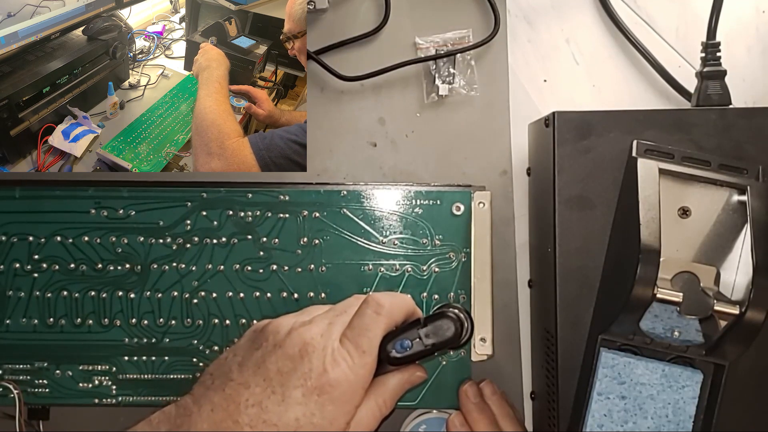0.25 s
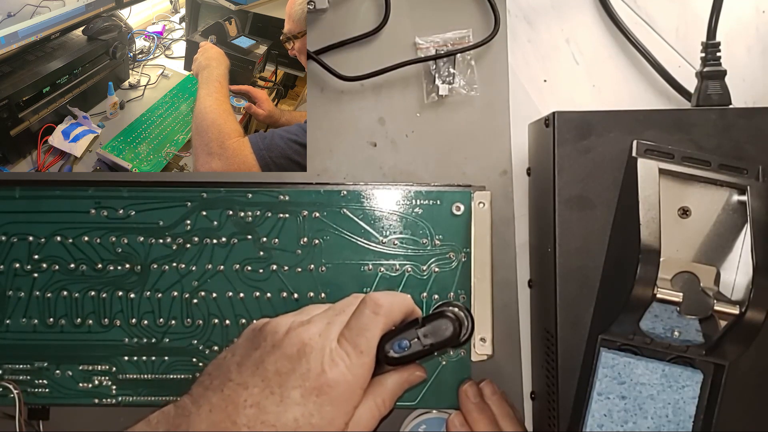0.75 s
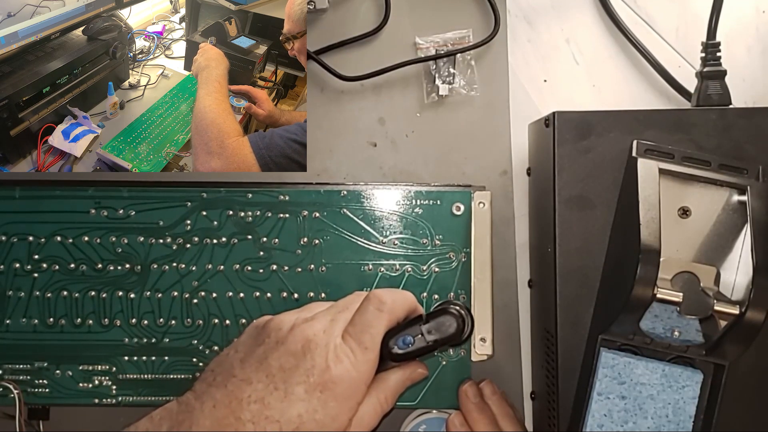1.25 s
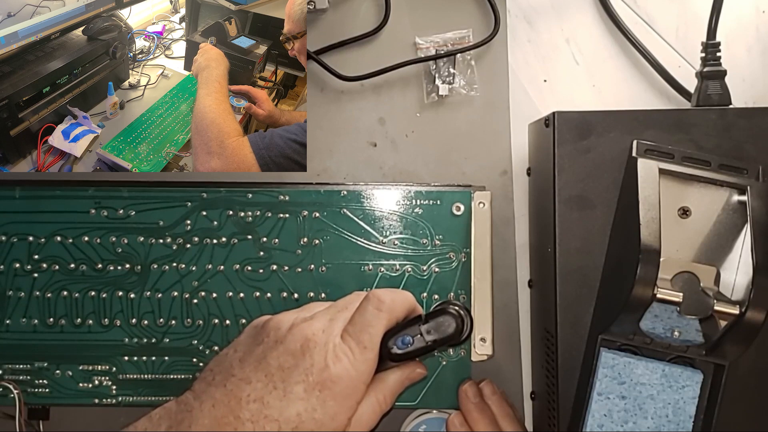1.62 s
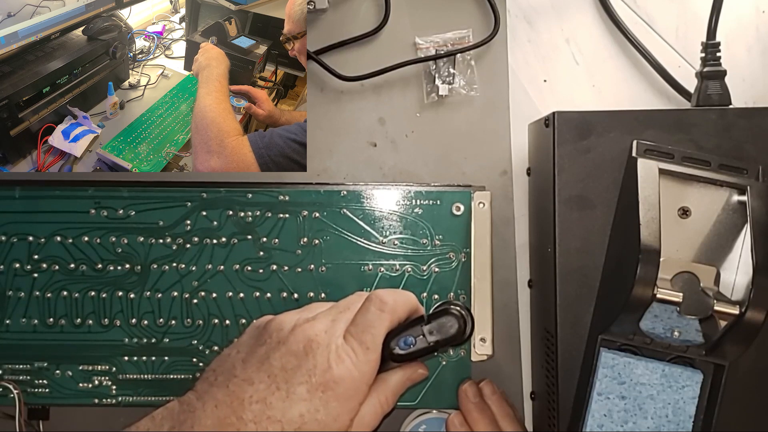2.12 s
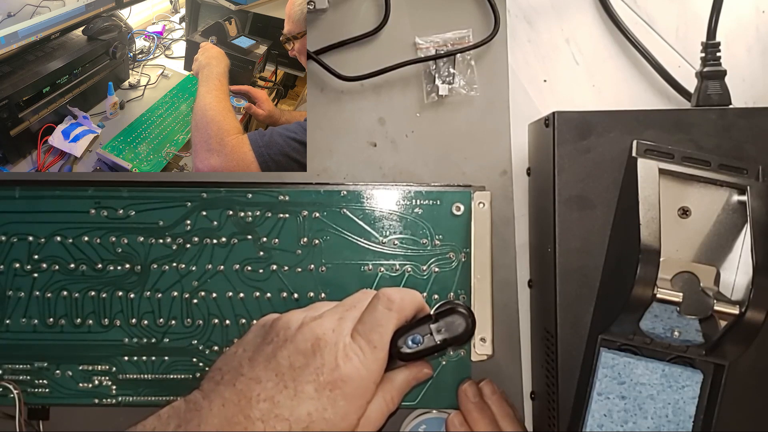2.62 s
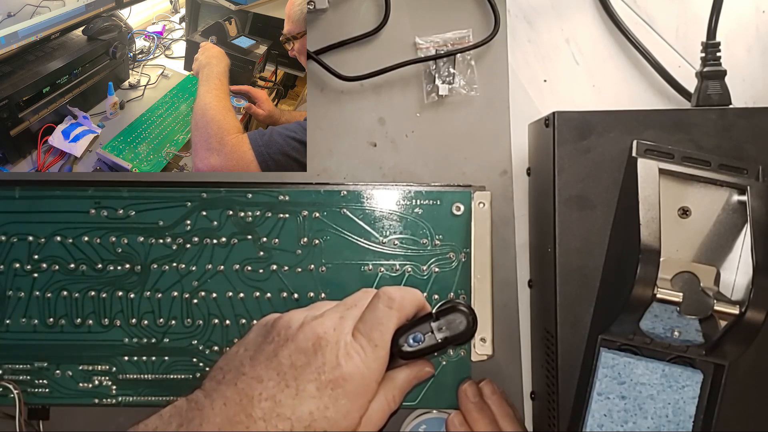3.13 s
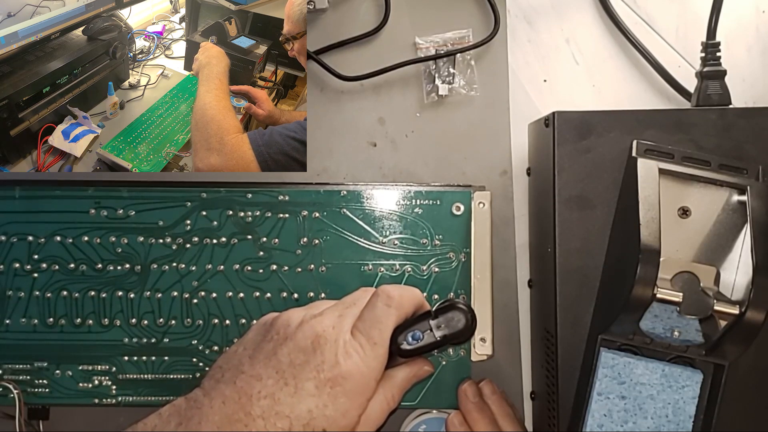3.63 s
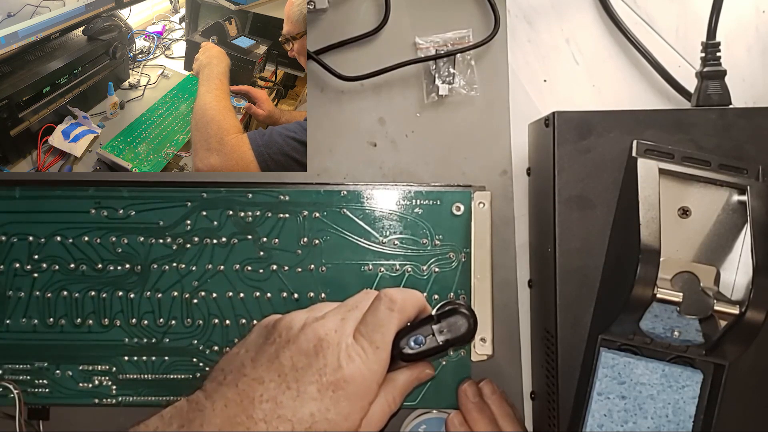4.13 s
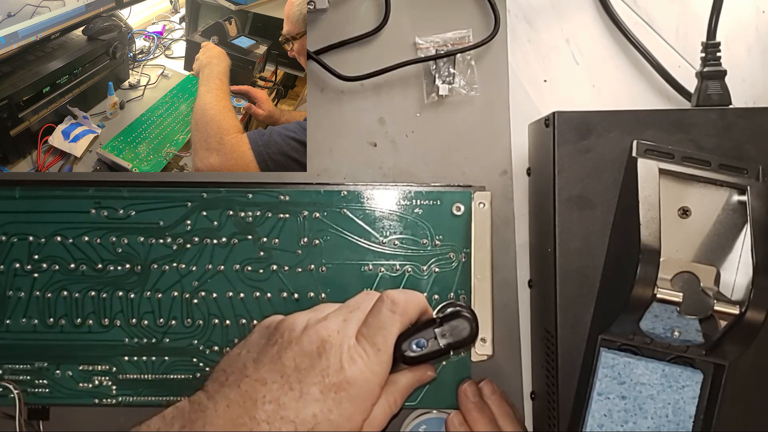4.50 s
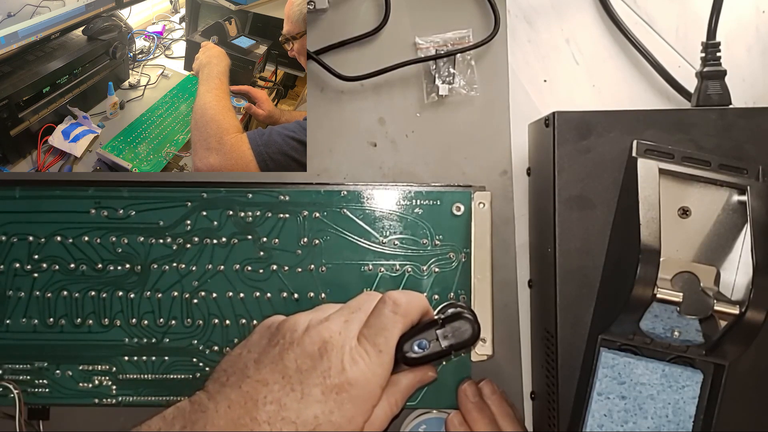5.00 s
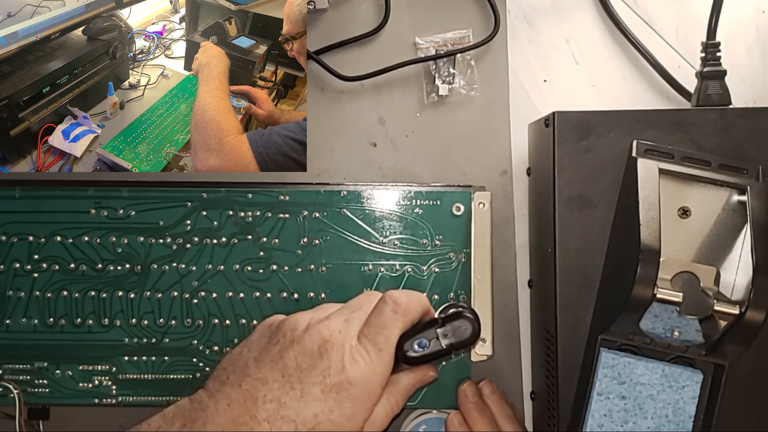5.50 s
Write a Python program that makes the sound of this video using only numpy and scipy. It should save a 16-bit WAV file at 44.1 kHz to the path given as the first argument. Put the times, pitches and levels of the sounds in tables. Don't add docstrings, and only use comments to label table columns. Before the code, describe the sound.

Quiet bench with ventilation rumble and a few soft board touches, then a trigger snap, a rough vacuum motor burr of over a second, and a release click.

```python
import sys
import numpy as np
from scipy import signal
from scipy.fft import rfft, irfft
from scipy.io import wavfile
from scipy.ndimage import uniform_filter1d

SR = 44100
rng = np.random.default_rng(int(sys.argv[2]) if len(sys.argv) > 2 else 0)


def invert_db(level):
    return 10 ** (np.asarray(level, dtype=float) / 20)


def wrap_up_sound(samples):
    columns = np.atleast_2d(samples).T
    tamed = np.clip(columns, -1, 1)
    steps = np.round(tamed * 32767).astype(np.int16)
    wavfile.write(sys.argv[1], SR, steps)


N = 253575
T = np.arange(N) / SR
HZ = np.fft.rfftfreq(N, 1 / SR) + 1e-3


def at(table, hz):
    table_hz, value = np.array(table).T
    return np.interp(np.log(hz), np.log(table_hz), value)


def humps(modes, hz):
    return sum(invert_db(2 * db) / (1 + (2 * (hz - f) / width) ** 2) for f, width, db in modes)


def walk(rate_hz, size=N):
    hold = int(SR / rate_hz)
    draws = rng.standard_normal(N // hold + 1)[:size // hold + 1]
    steps = np.repeat(draws, hold)
    return 1.3 * uniform_filter1d(uniform_filter1d(steps, hold), hold)[:size]


# (time [s], speed [Hz])
SHAFT_SPEED = [
    (4.18, 27),
    (4.23, 30.3),
    (4.3, 29.9),
    (4.37, 28.3),
    (4.43, 27.41),
    (5.57, 27.41),
    (5.62, 22),
]
# (rate [Hz], swing [Hz], phase [rad], overtone [Hz], its phase [rad], start [s])
CIRCLING = (5.5, 1.0, -2.5, .23, 1.34, 4.45)
SEAL_S, SEAL_WIDTH_S = 4.36, 0.072


def shaft():
    rate_hz, swing_hz, swing_rad, overtone_hz, overtone_rad, since_s = CIRCLING
    circle = 2 * np.pi * rate_hz * (T - since_s)
    sealed = 1 / (1 + np.exp(-np.clip((T - SEAL_S) / SEAL_WIDTH_S, -30, 30)))
    steady_hz = np.interp(T, *np.transpose(SHAFT_SPEED))
    sway = swing_hz / rate_hz * np.sin(circle + swing_rad)
    sway = sway + overtone_hz / rate_hz / 2 * np.sin(2 * circle + overtone_rad)
    angle = 2 * np.pi * np.cumsum(steady_hz) / SR
    angle = angle - angle[int(since_s * SR)] + sealed * sway + .012 * walk(25)
    return np.gradient(angle) * SR / (2 * np.pi), angle, sealed


# (multiple of shaft speed, level [dB])
SHAFT_ORDERS = [(4, -46), (5, -33), (6, -32), (7, -50), (8, -34), (9, -21), (10, -18), (11, -23), (12, -32),
                (13, -33), (14, -22), (15, -13), (16, -20), (17, -31), (18, -31), (19, -26), (20, -29)]
# (frequency [Hz], width [Hz], level [dB])
HOUSING = [(151, 16, 20), (250, 40, 13), (295, 40, 10), (412, 60, 12), (520, 40, 14)]
# (frequency [Hz], level [dB])
WHINE = [(560, -35), (640, -9.5), (1100, -5.5), (1250, -14.5), (1600, -25), (2000, -39), (2500, -45)]
# (frequency [Hz], width [Hz], level [dB])
COVER = [(688.5, 20, 12.5), (780, 45, 8), (923, 10.4, 6), (990, 6.5, 8.5), (1195, 42, 15.5),
         (1360, 26, 11.5)]
STROKE_RAD = 2.6


def orders(hz, angle, sealed):
    load = .45 + .55 * sealed
    loaded_hz = SHAFT_SPEED[-2][1]
    out = 0
    for k, db in SHAFT_ORDERS:
        side, overtone = (k + 2) % 5 - 2, (k + 2) // 5
        tilt = np.sqrt((1 + humps(HOUSING, k * hz)) / (1 + humps(HOUSING, k * loaded_hz)))
        dull_db = 1.0 * (1 - sealed) * (12.5 - k)
        flutter = invert_db(2.0 * sealed * walk(23, size=len(hz)) + dull_db)
        lag = side * STROKE_RAD + np.pi * (side == -1)
        lag = lag + abs(side) * (overtone - 2.3) + .4 * overtone ** 2
        out = out + invert_db(db) * tilt * flutter * load ** abs(side) * np.cos(k * angle + lag)
    return out


def knocking(angle):
    size = len(angle)
    knock = 0
    for k in range(21, 92):
        level = invert_db(2 * walk(30, size) + 3 * (k % 5 == 0))
        lag = 2.4 * rng.random() + 2.5 * np.sin(k / 3.1) + .35 * walk(14, size)
        knock = knock + level * np.cos(k * angle + lag)
    knock = knock * invert_db(2.2 * walk(44.58, size=size))
    f = np.fft.rfftfreq(size, 1 / SR) + 1e-3
    cover = 1 + sum(invert_db(db) / (1 + 2j * (f - centre) / width) for centre, width, db in COVER)
    return invert_db(-41.0) * irfft(rfft(knock) * cover * invert_db(at(WHINE, f)), size)


def motor():
    hz, angle, sealed = (v[int(4 * SR):] for v in shaft())
    out = orders(hz, angle, sealed) + knocking(angle)
    running_rms = np.sqrt(np.mean(out[SR // 2:3 * SR // 2] ** 2))
    return np.concatenate([np.zeros(N - len(out)), out / running_rms])


# (time [s], peak [dB], left minus right [dB])
PRESS = [
    (4.182, 0.5, -2),
]
# (time [s], peak [dB], left minus right [dB])
RELEASE = [
    (5.5725, -3, 0.0),
]
# (time [s], hiss [dB], whistle [dB], fall [dB/s])
GULPS = [
    (4.188, -23, -37, 190),
    (4.376, -40, -24, 420),
    (4.586, -28, -24, 400),
    (5.168, -41, -35, 250),
    (5.382, -39, -31.5, 300),
    (5.573, -26, -31, 500),
    (5.64, -58, -36.5, 101),
]
MOTOR_DB, SPIN_UP_S, SPIN_UP_DB = -10, 0.065, -13.5
COAST_S, COAST_DB, COAST_DB_PER_S = 0.029, -19, -56
HISS_DB, WHISTLE_DB, UNSEALED_WHISTLE_DB, AIR_DIES_DB_PER_S = -38, -41, -16, -100
LIFT_S, LIFT_DB = 0.12, 6
GULP_RISE_DB_PER_S = 5000


def drive():
    on_s = T - PRESS[0][0]
    to_release_s = T - RELEASE[0][0]
    off_s = np.maximum(to_release_s, 0)
    spin_up_db = SPIN_UP_DB * np.clip(1 - on_s / SPIN_UP_S, 0, 1)
    coast_db = COAST_DB * np.minimum(off_s / COAST_S, 1) ** 2 + COAST_DB_PER_S * off_s
    motor_db = MOTOR_DB + spin_up_db + coast_db
    lift_db = LIFT_DB * np.exp(np.minimum(to_release_s, 0) / LIFT_S)
    hiss_power = invert_db(2 * (HISS_DB + lift_db + AIR_DIES_DB_PER_S * off_s))
    unsealed_db = UNSEALED_WHISTLE_DB * (T < GULPS[1][0])
    whistle_power = invert_db(2 * (WHISTLE_DB + unsealed_db + AIR_DIES_DB_PER_S * off_s / 2))
    for s, hiss_db, whistle_db, fall_db_per_s in GULPS:
        shape_db = -np.maximum(GULP_RISE_DB_PER_S * (s - T), fall_db_per_s * (T - s))
        shape_db = np.maximum(shape_db, -90)
        hiss_power = hiss_power + invert_db(2 * (hiss_db + shape_db))
        whistle_power = whistle_power + invert_db(2 * (whistle_db + shape_db))
    return motor_db, 10 * np.log10(hiss_power), 10 * np.log10(whistle_power)


def air(gain, alike, lean_db):
    mid, side = rfft(rng.standard_normal((2, N)))
    alike = np.clip(alike, -.99, .99)
    pair = np.sqrt(1 + alike) * mid + np.sqrt(1 - alike) * side * np.array([[1], [-1]])
    noise = irfft(pair * gain * invert_db(np.array([lean_db, -lean_db]) / 2), N)
    return noise / np.sqrt(np.mean(noise ** 2))


# (frequency [Hz], density [dB per Hz])
HISS = [(880, -2), (1500, 3.5), (1650, -4.5), (1970, 4), (2160, -3.5), (3840, -1.5), (4360, -2), (6400, -4),
        (7860, 0), (8920, -9.5), (10900, -1), (11700, -9.5), (14300, -5.5), (15600, -12)]
# (frequency [Hz], correlation [-1..1])
ALIKE = [(60, 0.91), (290, 0.88), (640, 0.24), (1400, -0.47), (3100, 0.13), (6800, -0.082), (9500, 0.8)]


def suction(hiss_db, whistle_db):
    hiss = air(invert_db(at(HISS, HZ)), at(ALIKE, HZ) + 0.031, 0 * HZ)
    hiss = hiss * invert_db(hiss_db + 6.0 + 0.92 * walk(24.88))
    whistle = air(humps([(7600, 1000, 0)], HZ), 0.97, 0 * HZ)
    return hiss + whistle * invert_db(whistle_db - 1.5 + 1.3 * walk(28))


def strike(s, db, pan_db, modes, crack_db, rattle_s, scatter_db=-2.5):
    t = np.arange(2048) / SR
    hz, mode_db, t60_s = np.transpose(modes)[:, :, None]
    level_luck, pitch_luck = rng.standard_normal((2, len(modes), 1))
    ring = invert_db(mode_db + scatter_db * level_luck) * np.sin(2 * np.pi * hz * (1 + 0.023 * pitch_luck) * t)
    decay = np.exp(-np.log(1000) * t / np.clip(t60_s, .006, .035))
    ring = np.sum(ring * decay * np.minimum(hz * t / 1.6, 1), axis=0)
    ring[1:3] += invert_db(crack_db) * np.array([1, -1])
    chatter = np.minimum(t / 0.00066, 1) * np.exp(-(t / rattle_s) ** 2)
    common, apart = rng.standard_normal((2, len(t))) * chatter
    common[24] += 2.5
    contact = common + 0.8 * apart * np.array([[1], [-1]])
    blow = signal.fftconvolve(contact, ring[None], axes=1)
    blow = blow / np.abs(blow.mean(axis=0)).max() * invert_db(db + np.array([[pan_db], [-pan_db]]) / 2)
    start = int(s * SR)
    sound = np.zeros((2, N))
    sound[:, start:start + blow.shape[1]] = blow[:, :N - start]
    return sound


# (frequency [Hz], level [dB], t60 [s])
PRESS_MODES = [(2025, -5.5, 0.038), (2630, -3.5, 0.024), (3420, -7.5, 0.015), (4140, 0.5, 0.014),
               (5890, -3.5, 0.021), (7180, -6.5, 0.011), (9320, 1, 0.0095), (10500, -20, 0.0091)]
RELEASE_MODES = [(2430, -1, 0.011), (3500, -5, 0.011), (4490, 4, 0.013), (5430, -20, .015),
                 (6990, -2, 0.018), (9900, -3, .015), (11400, -25, 0.012), (14000, -13, 0.013)]
# (frequency [Hz], level [dB], t60 [s])
BOARD = [(871, -0.5, 0.037), (850, -2, 0.069), (1020, 14, 0.021), (1113, -9, 0.036), (1270, -18.5, 0.05)]


def trigger():
    out = 0
    for s, db, pan_db in PRESS:
        out = out + strike(s + 0.0236, -24, 0, [(104, 0, 0.038)], crack_db=-40, rattle_s=0.027)
        out = out + strike(s, db - 0.5, pan_db, PRESS_MODES, crack_db=4, rattle_s=0.0088)
    for s, db, pan_db in RELEASE:
        out = out + strike(s, db + 3, pan_db, RELEASE_MODES, crack_db=13.5, rattle_s=0.0059)
        out = out + strike(s + .03, -13.5, pan_db, RELEASE_MODES[4:], crack_db=22, rattle_s=0.016)
        out = out + strike(s + 0.016, -14, pan_db, BOARD, crack_db=-20, rattle_s=0.0052)
    return out


# (time [s], peak [dB], bright share [dB], left minus right [dB])
TAPS = [(4.229, -18, -1, 3), (4.2432, -7, -10, -1), (4.256, -15, 1, 1), (4.267, -13, -8, -5),
        (4.281, -16, -4, 11), (4.291, -6, -8.5, 8), (4.296, -8.5, -8, -7), (4.336, -4.5, -8.5, 8),
        (4.341, 1, -14.5, -5), (4.355, -15, -3, -5), (4.373, 6.5, -8.5, 1), (4.389, -6, -5, -2.0),
        (4.4, -18.5, 1, -4), (4.411, -21, 1, 2), (4.575, -8.5, -4.5, -2), (4.584, 1, -12.5, 6),
        (4.6, -10.5, -3.5, 0), (4.638, -16, -7, 4), (5.507, -16.5, 0.5, 3), (5.522, -17.5, 2.5, -3),
        (5.528, -18, 4.5, 2)]
# (frequency [Hz], level [dB], t60 [s])
TUBE = [(2023, 6, 0.023), (2640, -4.5, 0.015), (2876, 8.5, 0.0093), (3580, 5.5, 0.006), (4880, -8, 0.025),
        (5900, -1.5, 0.0096), (7200, -2.5, 0.0085)]


def taps():
    out = 0
    for s, db, bright_db, pan_db in TAPS:
        out = out + strike(s, db + 0.5, pan_db, BOARD, crack_db=-30, rattle_s=0.0022)
        out = out + strike(s, db + bright_db + 2.5, pan_db, TUBE, crack_db=1, rattle_s=.005)
    return out


# (time [s], peak [dB], left minus right [dB])
NUDGES = [
    (0.272, -26, 4),
    (0.957, -20.5, 8),
    (1.404, -9, 4.5),
]
# (frequency [Hz], level [dB], t60 [s])
BARE_BOARD = [(770, -18, .03), (1087, 0, .028), (1330, -2, .026), (1750, -19, .012), (2200, -20, .012),
              (2570, -18, .018), (3300, -21, .012)]
SOFT_DULL_DB_PER_DB, SOFT_FROM_HZ = 0.47, 1500


def nudges():
    out = 0
    for s, db, pan_db in NUDGES:
        dull_db = SOFT_DULL_DB_PER_DB * (db - NUDGES[-1][1])
        modes = [(f, g + dull_db * (f > SOFT_FROM_HZ), t60_s) for f, g, t60_s in BARE_BOARD]
        out = out + strike(s, db + 2.5, pan_db, modes, crack_db=-45, rattle_s=.0004, scatter_db=1)
    return out


RUB_DB, STILL_DB = -45.5, -48.5


def rub():
    db = np.where(T < NUDGES[-1][0], RUB_DB, STILL_DB)
    return air(humps([(1150, 350, 0)], HZ), 0.35, 0 * HZ) * invert_db(db + 2.4 * walk(10.0))


# (frequency [Hz], level [dB], t60 [s])
CLOCK = [(1150, -3, .02), (1750, 0, .025), (2400, -3, .015), (2950, -2, .015), (3650, -3, .015),
         (4500, -5, .012), (5050, -4, .01), (6500, -8, .01)]
CLOCK_FIRST_S, CLOCK_CATCH_S, CLOCK_DB = .126, 0.048, -29
ODD_CATCH_DB = -9


def clock():
    out = 0
    for second in range(6):
        step_s = second + CLOCK_FIRST_S
        catch_db = CLOCK_DB - 0.5 + ODD_CATCH_DB * (second % 2)
        out = out + strike(step_s, CLOCK_DB, 1.5, CLOCK, crack_db=-8, rattle_s=0.034, scatter_db=-3.5)
        out = out + strike(step_s + CLOCK_CATCH_S, catch_db, 1.5, CLOCK, crack_db=-3, rattle_s=0.023)
    return out


# (frequency [Hz], density [dB per Hz])
SHOP = [(12, -42), (20, -10), (45, -1.5), (99, -14), (211, -9.5), (271, -14.5), (349, -10.5), (461, -13),
        (502, -18.5), (577, -14.5), (1630, -27.5), (6990, -38.5), (8750, -54.5), (13300, -49.5),
        (16200, -55)]
# (frequency [Hz], width [Hz], level [dB])
FANS = [(71, 30, -2), (218, 6.1, -1), (358, 26, -6.5), (464, 18, -6)]
# (frequency [Hz], left minus right [dB])
LEAN = [(60, -0.5), (110, 2.5), (200, -1), (380, -1.5), (700, 0), (1290, -0.5), (2380, 2.5), (4400, 2),
        (8120, 12.5), (15000, -7.5)]
SHOP_DB = -26


def shop():
    shop_db = at(SHOP, HZ)
    gain = invert_db(shop_db) * np.sqrt(1 + .5 * humps(FANS, HZ) / invert_db(2 * shop_db))
    hum_hz = 40.5 + 1.507 * walk(5.3)
    hum = invert_db(-31.5 + 2.1 * walk(8.2)) * np.sin(2 * np.pi * np.cumsum(hum_hz) / SR)
    return air(gain, at(ALIKE, HZ), at(LEAN, HZ)) * invert_db(SHOP_DB - 2.0 + 0.37 * walk(2.15)) + hum


def room(x, t60_s, wet_db):
    t = np.arange(SR // 2) / SR
    tail = rng.standard_normal((2, len(t))) * np.exp(-np.log(1000) * t / t60_s) * (t > .002)
    tail = tail * invert_db(wet_db) / np.sqrt(np.sum(tail ** 2, axis=1, keepdims=True))
    return x + signal.fftconvolve(x, tail, axes=1)[:, :N]


def scene():
    motor_db, hiss_db, whistle_db = drive()
    running = T > PRESS[0][0]
    pump = motor() * invert_db(motor_db + np.array([[.4], [-.4]])) * running
    blows = trigger() + taps() + nudges() + clock()
    near = room(pump, t60_s=.1, wet_db=-13) + room(blows, t60_s=.1, wet_db=-10)
    return near + suction(hiss_db, whistle_db) * running + rub() + shop()


def top_cut(x):
    return signal.sosfilt(signal.butter(12, 16480, fs=SR, output="sos"), x)


# (notch [Hz], width [Hz], level [dB])
PORT_NOTCH = (8950, 700, -12)
TOP_HZ = 15750


def record(dry):
    centre, width, db = PORT_NOTCH
    notch = 1 - (1 - invert_db(db)) / (1 + (2 * (HZ - centre) / width) ** 4)
    ports = notch / (1 + (HZ / TOP_HZ) ** 150)
    heard = irfft(rfft(dry) * ports, N)
    mix = heard / (1 + np.abs(heard) ** 6) ** (1 / 6)
    return top_cut(mix)


dry = scene()
out = record(dry)
wrap_up_sound(out)
```